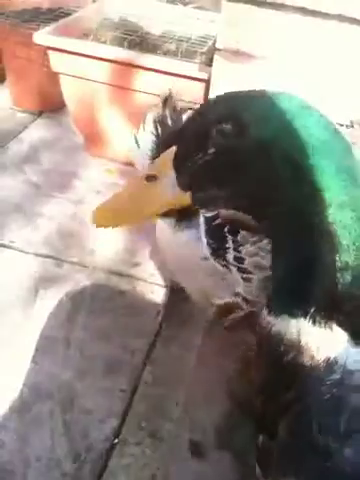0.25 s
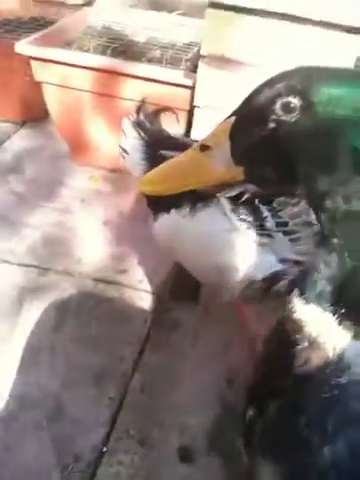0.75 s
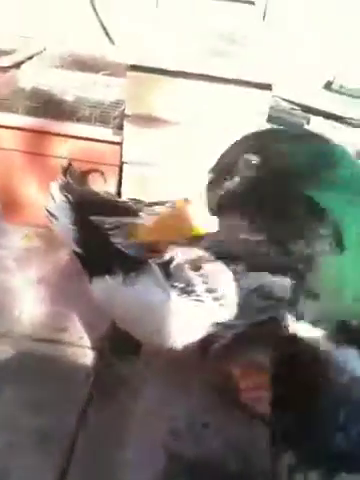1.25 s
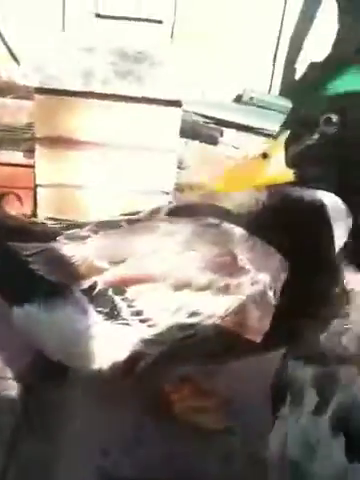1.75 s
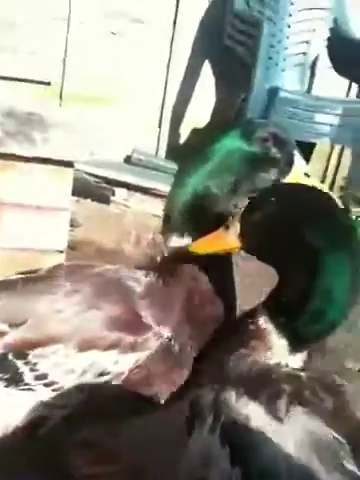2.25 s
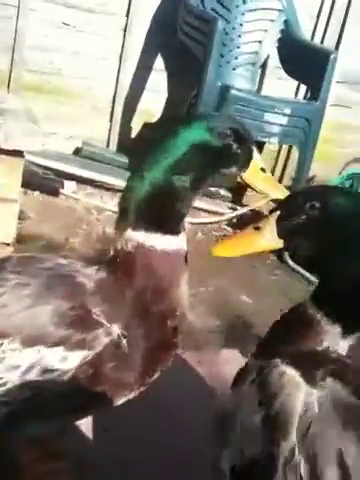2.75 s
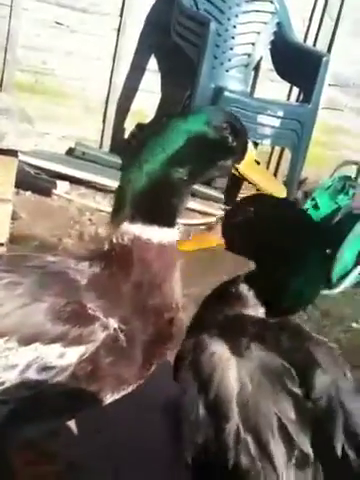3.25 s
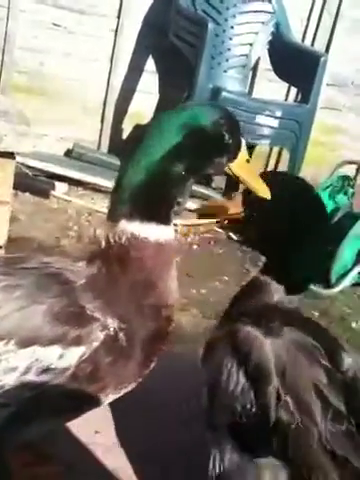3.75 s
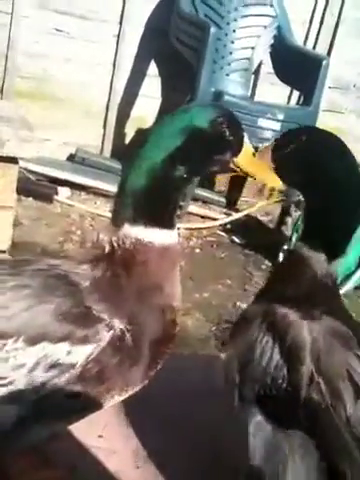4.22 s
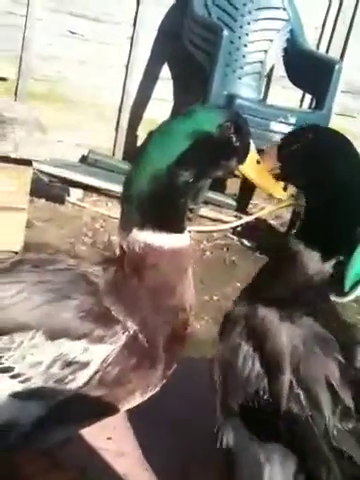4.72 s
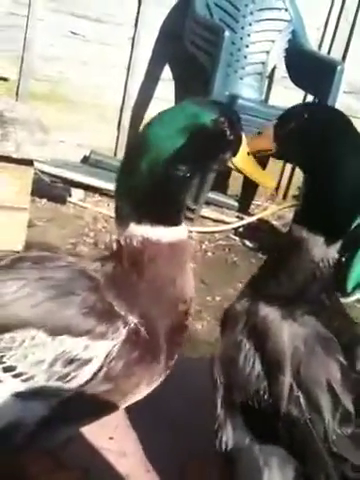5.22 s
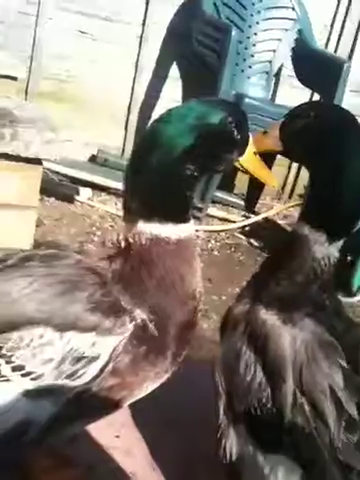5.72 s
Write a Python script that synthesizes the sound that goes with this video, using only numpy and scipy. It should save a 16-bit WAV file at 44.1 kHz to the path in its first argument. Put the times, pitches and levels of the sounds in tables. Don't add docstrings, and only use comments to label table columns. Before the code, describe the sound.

Close up in a small paved yard, two drakes quack in quick alternation for six seconds over a quiet, steady outdoor wash with faint hiss. A tiny bill click leads into the first rasp at 0.1 s; about thirty calls follow, unevenly spaced, roughly five a second. Each lasts 0.04 to 0.11 s: a hoarse, nasal burst of coarse pulses, like a short creak, with breathy air leaking through. One drake is brighter and longer, the other softer, duller and shorter. Wet little clicks or knocks precede most calls, strongest near 2.97 s. Low muffled foot thumps come around 0.3, 0.8, 1.1 to 1.4 and 2.8 to 3.4 s, then barely at 4.2 and 5.2 s. Brief feather flicks occur near 0.9 to 1.15 and 2.7 to 2.8 s, with faint brushes at 4.35 and 5.3 s. Walls add a short diffuse echo. A last soft call starts at 5.95 s and is cut off.

```python
import sys
import numpy as np
from scipy import signal
from scipy.fft import rfft, irfft
from scipy.io import wavfile
from scipy.ndimage import uniform_filter1d

SR = 44100
rng = np.random.default_rng(int(sys.argv[2]) if len(sys.argv) > 2 else 0)


def nominal_scale(level):
    x = np.asarray(level, float) / 20
    return 10 ** x


def store_pcm(level_fs):
    pcm = np.round(np.clip(level_fs, -1, 1) * 32767).astype(np.int16)
    wavfile.write(sys.argv[1], SR, np.atleast_2d(pcm).T)


N = 263718


def evened(x):
    return x / np.sqrt(np.mean(x ** 2) + 1e-20)


def read(points, hz):
    f, value = np.transpose(points)
    return np.interp(np.log(hz + 1), np.log(f + 1), value)


def add(mix, s, sound):
    part = mix[max(round(s * SR), 0):][:len(sound)]
    part += sound[:len(part)]


def hiss(colour, patchy_db):
    frames, hz = N // 256 + 5, np.fft.rfftfreq(1024, 1 / SR)
    real, imag, patches = rng.standard_normal((frames, 513, 3)).T
    patches = uniform_filter1d(patches, size=6, axis=0)
    patches = evened(uniform_filter1d(patches, size=10, axis=1))
    level_db = read(colour, hz)[:, None] + patchy_db * patches
    z = (real + 1j * imag) * nominal_scale(level_db)
    return evened(signal.istft(z, nperseg=1024, noverlap=768)[1][:N])


def air():
    # f/Hz, level/dB per Hz
    floor_colour = [(15, -57), (25, -40), (140, 1.5), (290, 0.5), (350, 0.5), (434, -5.5), (723, -9.5),
                    (873, -9), (1050, -10.5), (1710, -12), (1960, -17.5), (4390, -20), (5300, -21),
                    (7320, -18.5), (15600, -23.5)]
    # f/Hz, level/dB
    rustle_colour = [(2000, 20.5), (4000, 9.5), (8500, 16), (11500, 9), (13000, 1), (15500, -14)]
    # t/s of the peak, level/dB, length/s
    rustles = [
        (0.358, -72.5, 0.037),
        (0.891, -63.5, 0.0084),
        (0.955, -61, 0.0027),
        (1.146, -63, 0.014),
        (2.687, -68, 0.094),
        (2.813, -65, 0.011),
        (4.35, -74.5, 0.13),
        (5.287, -73, 0.17),
    ]
    # f/Hz, level/dB
    whine_tones = [
        (7485, -89),
        (14970, -93),
        (15030, -93),
    ]
    t = np.arange(N) / SR
    brush = sum(nominal_scale(db) * np.exp(-((t - s) / length) ** 2) for s, db, length in rustles)
    whine = sum(nominal_scale(db) * np.sin(2 * np.pi * hz * t) for hz, db in whine_tones)
    wash = nominal_scale(-68) * hiss(floor_colour, patchy_db=.7)
    return wash + brush * hiss(rustle_colour, patchy_db=-0.5) + whine


def yard(x):
    # f/Hz, t60/s
    decay = [(300, 0.047), (1200, 0.23), (1500, 0.24), (1800, 0.25), (2200, 0.18), (5000, 0.24),
             (10000, 0.29)]
    taps = np.zeros(SR // 2)
    at = np.arange(200, SR // 2 - 20, 20)
    taps[at + rng.integers(0, 20, len(at))] = rng.choice([-1., 1.], len(at))
    hz, t, z = signal.stft(taps, SR, nperseg=256)
    decay_db = -60 * t / read(decay, hz)[:, None]
    tail = signal.istft(z * nominal_scale(decay_db), SR, nperseg=256)[1]
    return signal.fftconvolve(x, tail / np.linalg.norm(tail))[:N]


def thumps():
    # t/s, level/dB, f/Hz, length/s
    steps = [(0.267, -60.5, 138, 0.023), (0.818, -56.5, 217, 0.041), (0.849, -64, 205, 0.034),
             (1.127, -50.5, 157, 0.014), (1.294, -46.5, 126, 0.013), (1.431, -62, 218, 0.021),
             (2.822, -51, 192, 0.023), (2.907, -57, 235, 0.021), (3.072, -47.5, 188, 0.027),
             (3.104, -51.5, 156, 0.023), (3.149, -61, 189, 0.073), (3.375, -50.5, 208, 0.014),
             (4.179, -65, 113, 0.085), (5.249, -67.5, 136, 0.2)]
    out = np.zeros(N)
    for s, db, hz, length in steps:
        t = np.arange(0, 3 * length, 1 / SR)
        swell = np.minimum(t / 0.0094, 1) * np.exp(-(t / length) ** 2)
        add(out, s, nominal_scale(db) * swell * np.sin(2 * np.pi * hz * t))
    return out


def calls():
    # start t/s, length/s, effort level/dB, palate/dB re throat, bill/dB re throat
    loud_calls = [(0.104, 0.057, -37.5, 4, -3.5), (0.876, 0.067, -41.5, 4, 4), (1.467, 0.089, -38, -2.5, 5),
                  (2.054, 0.097, -36.5, -2, 4.5), (2.627, 0.079, -37.5, -5, 8.5),
                  (3.193, 0.094, -37.5, -0.5, 3.5), (3.863, .11, -41, 0, 9), (4.195, 0.079, -40.5, 2, 7.5),
                  (4.497, 0.068, -40, 2, 5), (4.821, 0.074, -41.5, 5.5, 9.5),
                  (5.041, 0.1, -38.5, 0.5, 10.5), (5.7, 0.091, -38, -1.5, 5.5)]
    soft_calls = [(0.405, 0.06, -44, 4, -6.5), (0.649, 0.07, -42.5, -12, -9.5),
                  (1.039, 0.053, -41.5, 0.5, -25), (1.238, .052, -37.5, -4, -15),
                  (1.43, 0.046, -43.5, 11.5, 7.5), (1.83, 0.052, -37, -0.5, -11),
                  (1.918, 0.043, -43.5, -5, -3), (2.166, 0.064, -45, 6.5, 7.5),
                  (2.409, 0.056, -36.5, -3, -8), (2.981, 0.063, -39, -5, -9), (3.458, 0.079, -45, 6.5, 2),
                  (3.656, 0.054, -38, -10, -11), (4.085, 0.096, -42, 3.5, -6), (4.451, 0.041, -39, -5, -23),
                  (4.753, 0.059, -42.5, -3, -16), (5.299, 0.084, -41, -1, 0.5), (5.482, 0.079, -41, 2, -6),
                  (5.95, 0.064, -41, 1.5, -8)]
    # place of its top (-1 start, 1 end), loss/dB half a call before, after it
    loud_arches = [
        (-0.13, -1, 3),
        (-0.35, 6, 5.6),
        (-0.13, 14, 16),
        (-0.25, 31, 33),
    ]
    soft_arches = [
        (-0.54, 5.1, 4.1),
        (-0.18, 11.5, 12),
        (-0.24, 15, 31),
        (-0.28, 14, 34),
    ]
    # palate f/Hz, bill f/Hz, chest/dB re throat, upper sheen/dB re call
    mouths = [(1814, 2210, -0.5, -26.5), (1680, 2400, 3, -35), (1710, 2400, -1, -31), (1845, 2065, -1, -21),
              (1710, 4700, -4.5, -31), (1813, 2220, -5.5, -24), (1788, 2080, -0.5, -23),
              (1810, 2190, -6, -20.5), (1820, 2190, -2.5, -38), (1730, 2180, -2, -20),
              (1820, 2190, -8.5, -28), (1840, 2220, 0, -23), (1820, 2160, -6.5, -24),
              (1840, 2207, -5, -20.5), (1780, 2240, -4, -27), (1770, 2176, -6, -23),
              (1893, 2280, 0.5, -27.5), (1730, 2220, -7.5, -21), (1670, 2176, -8, -18.5),
              (1816, 2170, -9.5, -27.5), (1760, 2130, -9.5, -23.5), (1735, 2230, -8.5, -33),
              (1733, 2170, -5.5, -23), (1735, 2170, -5, -21.5), (1782, 2150, -6, -22),
              (1730, 2243, -6, -19), (1743, 2140, -12.5, -30), (1760, 2160, -6.5, -18),
              (1756, 2184, -6, -18.5), (1760, 1100, -12, -26)]
    both = [(row, loud_arches) for row in loud_calls] + [(row, soft_arches) for row in soft_calls]
    return [(row, arches, shape) for (row, arches), shape in zip(sorted(both), mouths)]


def arch_db(s, row, arches, chest_db):
    start, length, effort_db, palate_db, bill_db = row
    place = 2 * (np.asarray(s) - start) / length - 1
    levels = []
    for db, (top, rise_db, fall_db) in zip((chest_db, 0, palate_db, bill_db), arches):
        loss_db = abs(np.where(place < top, rise_db, fall_db))
        levels.append(effort_db + db - loss_db * (place - top) ** 2)
    return levels


def breath(lead_s=0.025, leak_db=-20, fade_s=0.006):
    # f/Hz, level/dB
    leak_colour = [(500, -50), (1150, -5.5), (1400, 5), (1600, -12), (1800, -23), (2200, -4.5), (2900, -16),
                   (3300, -23), (4000, -20.5), (5000, -19), (5700, -24), (6800, -38), (9000, -65)]
    t, flow = np.arange(N) / SR, np.zeros(N)
    for row, arches, (*_, chest_db, _) in calls():
        s = row[0] + np.linspace(0, row[1], num=5)
        whole = nominal_scale(np.max(arch_db(s, row, arches, chest_db), axis=0) + leak_db)
        flow += np.interp(t, [s[0] - lead_s, *s, s[-1] + fade_s], [0, *whole, 0])
    return flow * hiss(leak_colour, patchy_db=0.5)


def clicks():
    # t/s, level/dB, f/Hz, brightness/dB
    pops = [(0.066, -53, 425, -13), (0.375, -44, 395, -21), (0.619, -43.5, 720, -10),
            (0.661, -38.5, 812, -33), (1.016, -41, 760, -9), (1.133, -52, 596, -1.5),
            (1.215, -42.5, 763, -8), (1.405, -39.5, 745, -6.5), (1.641, -67, 517, 7),
            (1.806, -45.5, 800, -13.5), (1.891, -43, 744, -15), (2.142, -38.5, 737, -14),
            (2.382, -45, 780, -12), (2.817, -53, 290, -15), (2.959, -38.5, 743, -13),
            (2.968, -34.5, 737, -16), (3.218, -41, 770, -8), (3.431, -45, 770, -10),
            (3.638, -46, 770, -10.5), (3.826, -44.5, 777, -8), (4.071, -43, 730, -13),
            (4.18, -46.5, 780, -7.5), (4.427, -44.5, 760, -4), (4.478, -45.5, 775, -9),
            (4.727, -45, 760, -7.5), (4.801, -43, 737, -6.5), (5.03, -44.5, 767, -13),
            (5.275, -43.5, 740, -19), (5.46, -42.5, 777, -6.5), (5.926, -42.5, 750, -16)]
    # f/Hz, level/dB
    spit_colour = [(1000, -16), (1900, 20.5), (2800, 15), (3600, 17), (4600, 7.5), (5800, 6.5), (7500, 0.5),
                   (10000, -3), (15000, -67)]
    out, t = np.zeros(N), np.arange(2048) / SR
    hz = np.fft.rfftfreq(2048, 1 / SR)
    for s, db, pitch_hz, bright_db in pops:
        spit = irfft(rfft(rng.standard_normal(len(t))) * nominal_scale(read(spit_colour, hz)))
        spit = evened(spit) * t / 0.00078 * np.exp(1 - t / 0.0014)
        knock = np.sin(2 * np.pi * pitch_hz * t) * (np.exp(-t / 0.0019) + 0.33 * np.exp(-t / 0.01))
        push = np.sin(2 * np.pi * 380 * t) * np.exp(-t / 0.0017)
        pop = np.minimum(t / 0.00095, 1) * (knock - 0.67 * push)
        add(out, s + 0.00044, nominal_scale(db + 1) * (pop + nominal_scale(bright_db - 9) * spit))
    return out


def ring(hz, ring_s, rough, luck, scoop=.025):
    t = np.arange(900) / SR
    rise = t / (3 * ring_s)
    swell = (rise * np.exp(1 - rise)) ** 3
    turns = hz * (t + scoop * ring_s * np.exp(-t / ring_s)) + luck[0]
    knots = luck[1::2] + 1j * luck[2::2]
    smooth = np.hanning(38) / np.hanning(38).sum()
    ragged = np.convolve(np.repeat(knots, 36), smooth, "same")
    wave = ((1 + rough * ragged) * np.exp(2j * np.pi * turns)).real
    return swell * wave / np.sqrt(1 + 2 * rough ** 2)


def quack(mix, row, arches, shape, beat, jitter_s=.001, detune=.012, uneven_db=2.6, lead_db=-13, droop=.04):
    # ring time/s, lag of the peak/s, raggedness
    main_rings = [
        (.0017, -.003, .33),
        (.0016, -.0015, .38),
        (.0013, 0., .22),
        (.0012, 0., .12),
    ]
    # f/Hz, ring time/s, level/dB, raggedness, share of sheen (0-1)
    overtones = [(825.4, 0.00213, -23.5, 0.14, 0.12), (2547, 0.000733, -12.5, 1, 0.41),
                 (3273, 0.0018, -10, 0.47, 0.72), (4270, 0.001, -12, 0.97, 0.65),
                 (4687, 0.0012, -6, 0.57, 0.98), (5026, .0013, -3, 0.49, 0.97),
                 (5430, 0.0025, -19.5, 0.074, 0.75), (6210, 0.0014, -21, 0.32, 0.98)]
    start, length = row[:2]
    anchor, rate, drift, throat_hz = beat
    *upper_hz, chest_db, sheen_db = shape
    tones = (1157.5, throat_hz, *upper_hz)
    k = np.arange(-9, 12)
    luck = rng.standard_normal((len(k), 12, 54))
    square = rate ** 2 + 2 * drift * k
    times = anchor + 2 * k / (rate + np.sqrt(abs(square)))
    for at, draws, ok in zip(times, luck, square > 0):
        if not ok or at < start - 1 / rate or at > start + length:
            continue
        early = at < start
        levels = np.add(arch_db(max(at, start), row, arches, chest_db), lead_db * early)
        whole_db = 10 * np.log10(np.sum(nominal_scale(levels) ** 2))
        place = 2 * (at - start) / length - 1
        shine_db = sheen_db - 3 * (place + 0.38) ** 2
        mouth = 1 - droop * place ** 2
        modes = [(hz * mouth, r, lag, db, rough)
                 for hz, db, (r, lag, rough) in zip(tones, levels, main_rings)]
        modes += [(hz, r, .0008, whole_db + db + share * shine_db, rough)
                  for hz, r, db, rough, share in overtones]
        for (hz, r, lag, db, rough), draw in zip(modes, draws):
            sound = ring(hz * (1 + detune * draw[1]), r, rough, draw[3:])
            peak_s = at + lag + jitter_s * draw[2]
            add(mix, peak_s - 3 * r, nominal_scale(db + uneven_db * draw[0]) * sound)


def scene():
    # t/s of a strong pulse, pulse rate/Hz, rate change/(Hz/s), throat f/Hz
    beats = [(0.117, 70, -300, 1340), (0.434, 69, 0, 1480), (0.663, 73, -25, 1370), (0.902, 76, -100, 1410),
             (1.059, 66, 100, 1360), (1.256, 67, -300, 1380), (1.444, 74, 0, 1300), (1.491, 81, -75, 1300),
             (1.847, 67, -300, 1420), (1.938, 67, -200, 1390), (2.089, 79, -300, 1440),
             (2.196, 76, -125, 1440), (2.423, 70, -225, 1410), (2.639, 84, -175, 1420),
             (2.997, 70, -300, 1370), (3.228, 86, -50, 1310), (3.486, 76, -250, 1250), (3.68, 67, 75, 1330),
             (3.887, 86, -300, 1350), (4.109, 79, -300, 1420), (4.208, 77, -250, 1420),
             (4.47, 78, 100, 1410), (4.521, 78, -275, 1390), (4.771, 64, 0, 1340), (4.841, 75, -150, 1330),
             (5.09, 78, -200, 1370), (5.316, 74, -150, 1390), (5.516, 68, -275, 1360),
             (5.737, 77, -225, 1370), (5.967, 72, 0, 1360)]
    ducks = clicks() + breath()
    for call, beat in zip(calls(), beats):
        quack(ducks, *call, beat)
    return (ducks + nominal_scale(-9.5) * yard(ducks) + thumps() + air())[None]


def roll_off(x):
    return signal.sosfilt(signal.butter(12, 15710, fs=SR, output="sos"), x)


def record(dry):
    thin = signal.sosfilt(signal.butter(2, 62, "high", fs=SR, output="sos"), dry)
    edge = signal.firwin(401, 15720, window=("kaiser", 9), fs=SR)
    return roll_off(signal.oaconvolve(thin, edge[None], "same"))


dry = scene()
out = record(dry)
store_pcm(out)
```